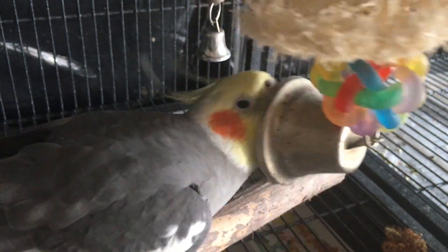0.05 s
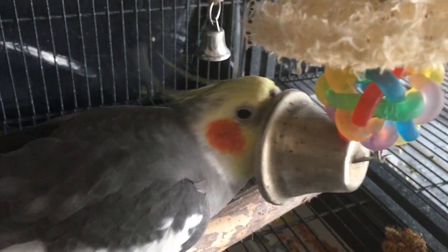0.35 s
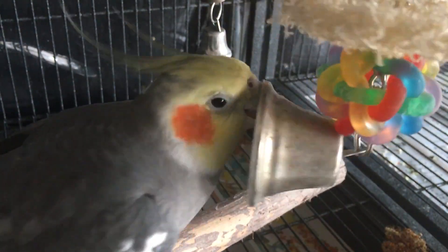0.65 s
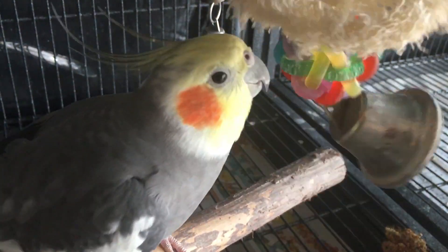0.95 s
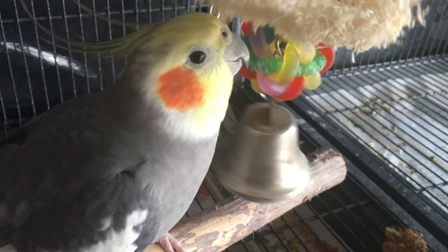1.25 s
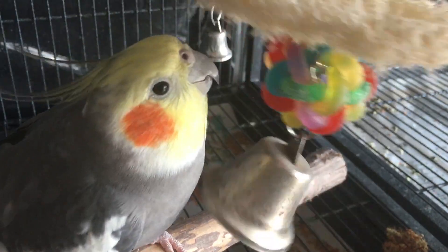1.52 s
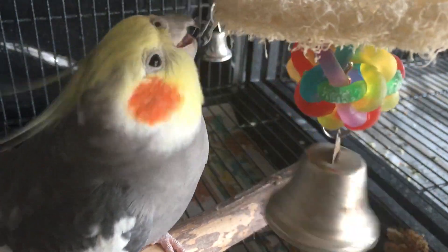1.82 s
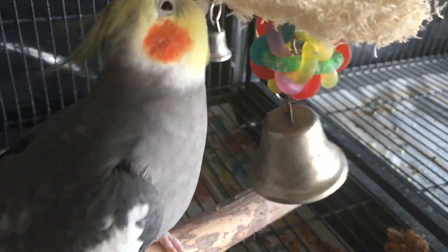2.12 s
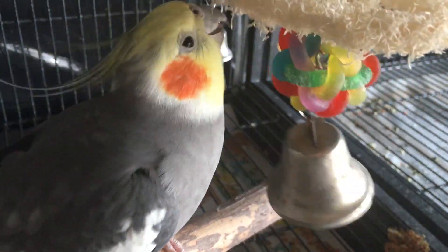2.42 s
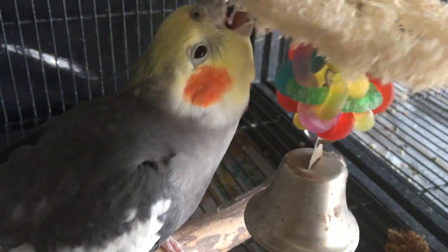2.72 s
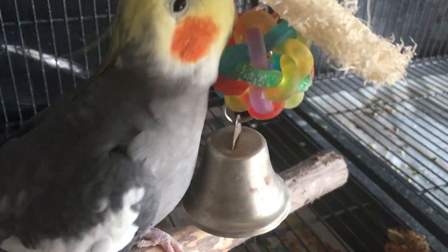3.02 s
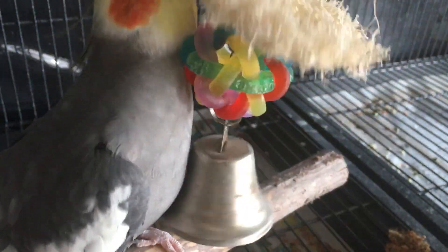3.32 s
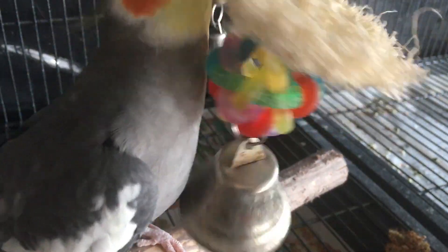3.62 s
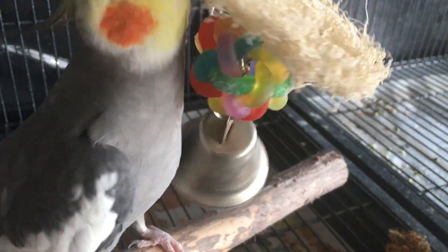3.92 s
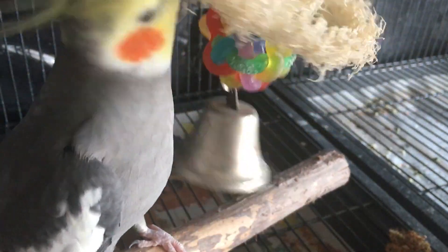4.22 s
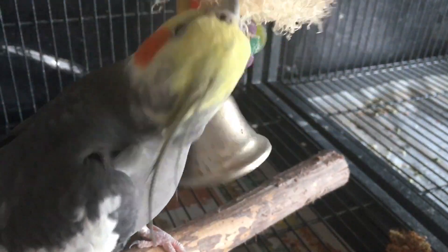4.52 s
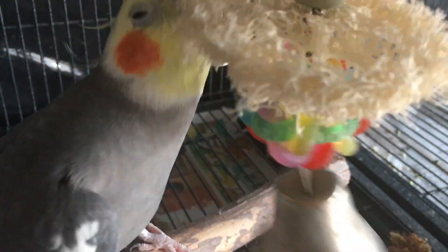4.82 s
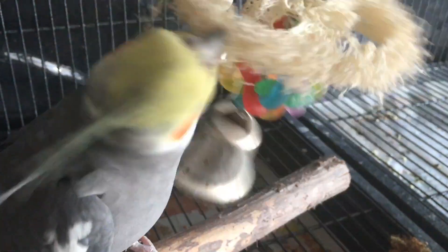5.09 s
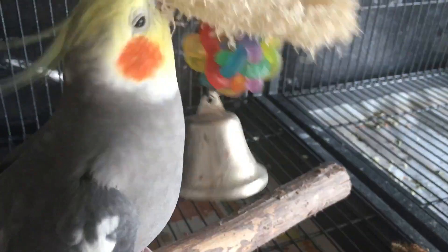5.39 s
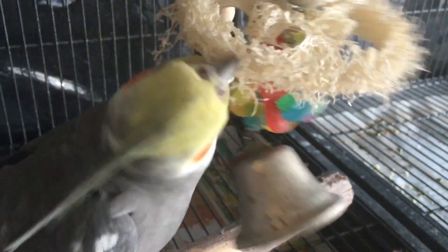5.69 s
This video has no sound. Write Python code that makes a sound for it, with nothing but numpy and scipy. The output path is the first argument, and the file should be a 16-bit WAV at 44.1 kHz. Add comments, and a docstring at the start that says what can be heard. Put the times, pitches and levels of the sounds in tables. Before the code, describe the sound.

Close to the microphone, a small metal bell tinkles faintly and then rings out three times as a caged bird pushes at it. The beak scrapes and nibbles quietly while a hook and plastic rings click and the toy knocks about. The cage gives one dull thump before the bell rings twice more. The room has a short echo and a faint, steady electrical hum.

```python
"""A cockatiel plays with a hanging toy in its cage, close up. Chain links ping and the beak nudges the
clapper inside a small steel bell; from 0.9 s the clapper lands three bright, ringing blows. A quieter
stretch follows: hook and plastic rings tick, the beak rasps and nibbles on fibre, the hollow toy knocks
about. Near 4.8 s a hard tug jolts the cage, and two more bell strikes close the scene. All along, the
cage scatters the clicks, the room adds a short tail, and room noise and mains hum lie underneath."""
import sys
import numpy as np
from scipy import signal
from scipy.fft import rfft, irfft, next_fast_len
from scipy.io import wavfile
from scipy.ndimage import map_coordinates

SR = 44100
rng = np.random.default_rng(int(sys.argv[2]) if len(sys.argv) > 2 else 0)


def dump_mix(stems):
    """Bounce the given channels to the path in sys.argv[1] as a 16-bit WAV at rate SR."""
    frames = np.atleast_2d(stems).T  # one column per channel
    limited = np.clip(frames, -1, 1)  # hard clip at full scale
    pcm = np.round(limited * 32767).astype(np.int16)
    wavfile.write(sys.argv[1], SR, pcm)


N = 262395

# steel bell modes: f/Hz, level/dB, t60/s, gain/dB per unit of position across the rim, same along it
BELL_MODES = [(1217.3, -38, .55, -14, 12), (1220, -41, 1.4, -8, 2), (1311.5, -38, .8, 5.5, 1),
              (2866, -36.5, .3, -14, 3), (2875, -35.5, .6, -12, 0), (4753, -51, .32, 8, 2),
              (7797, -32, .32, -3, -6), (7933, -28, .34, -10, -3), (8525, -15, .22, 4, 0),
              (8578, -3, .135, 5.5, 1), (8768, -22, .35, -1, -3), (11130, -35, .17, 4, -7),
              (11329, -23, .16, 3, -1), (11510, -14.5, .09, 3, 5), (11600, -7.5, .11, -3, -7),
              (11792, -18.5, .16, 5, -10), (11904, -19, .11, 9, 4), (12872, -11.5, .07, 0, -7),
              (12955, -21, .09, 0, 1), (14855, -20.5, .115, 1, -5), (15180, -36, .18, 2, -1)]
# clapper blows: t/s, ring level/dB, position across the rim, position along it, crack level/dB
BELL_STRIKES = [(.9244, -11.5, 1, -1.13, -17), (1.2835, -10.5, -0.071, -0.44, -23),
                (1.6972, -17.5, 0.8, -0.099, -26), (5.4322, -11, -0.44, 0.14, -23),
                (5.9, -13.5, -1.14, -0.27, -24.5)]
# modes of the small parts: f/Hz, level/dB, t60/s
CLAPPER_MODES = [(8650, -4.5, .12), (10280, -2, 0.088), (12995, -6, .1)]
LINK_MODES = [(12100, -10, .04), (12400, -7, .03), (12620, -4, .016), (13100, -9, .03)]
TINY_BELL_MODES = [(9500, -28, 0.078), (13900, -1, 0.17)]
PLASTIC_MODES = [(2420, -6, .04), (3280, 0, .045), (3650, -4, .035), (5700, -1, .03), (6600, -4, .03)]
# featured ticks of beak, hook and rings: t/s, level/dB, treble trim/dB, body trim/dB
TOY_TICKS = [(0.057, -57, 12.5, 7), (0.1296, -55.5, 8, 13), (.15, -54.5, 7, 5), (0.1771, -44.5, -5, -5),
             (0.2206, -44, -10, -1.5), (0.3965, -50, -9, 7.5), (.63, -42.5, -3, 2), (0.7952, -45, 4.5, -5),
             (.8478, -43, 2.5, -3), (0.9009, -33.5, 6, -8), (0.944, -35.5, -16, -6), (0.982, -38, -19, 1),
             (1.1276, -52.5, -9.5, 5), (1.4134, -50, 3, -20), (1.476, -49.5, -5, -18),
             (1.5693, -46.5, -5.5, -16), (1.6164, -52.5, -6.5, 0), (1.771, -42, 0, 5),
             (2.1161, -44.5, -6, -18), (2.2756, -49, -1, -21.5), (2.778, -52.5, 1.5, -18),
             (2.9126, -50.5, 7, -13.5), (3.042, -50.5, -5, -8), (3.0919, -52, 4.5, -13),
             (3.2481, -42.5, 3, -15.5), (3.5667, -46.5, 3, -18), (3.7926, -51.5, 2.5, 0.5),
             (3.8431, -47, -19.5, -14), (4.1634, -49.5, -1, -20), (4.7209, -53, 0, 5),
             (4.775, -39.5, 9.5, -19), (4.962, -41, -6, -16), (5.047, -51, -4.5, -14),
             (5.1662, -51, 2.5, -16), (5.353, -56.5, 11.5, -17.5), (5.5601, -41, 6.5, -2),
             (5.647, -45.5, 9.5, -12), (5.886, -44.5, 10.5, -19)]
# cues for the swinging toy, its chain and the tiny bell overhead: t/s, level/dB
TOY_KNOCKS = [(2.839, -48), (3.515, -56.5), (3.674, -46.5), (3.982, -45), (4.458, -40), (4.512, -44),
              (4.774, -41)]
LINK_PINGS = [(.0095, -34), (.0222, -32.5), (.058, -54), (.124, -40), (2.1147, -31), (3.5667, -46.5)]
TINY_BELL_TINKLES = [(1.062, -57), (1.622, -68.5), (2.14, -64), (5.783, -64), (5.80, -62)]
# featured rasps of the beak on fibre and plastic: t/s, length/s, level/dB
BEAK_RASPS = [(.115, .041, -56.5), (.429, 0.061, -51), (.892, 0.032, -42), (2.155, 0.039, -54),
              (4.351, 0.034, -46.5), (4.607, 0.02, -53.5), (4.732, 0.032, -41.5)]
# how hard the bird works at the toy: t/s, level/dB
BIRD_EFFORT = [(0.0, -68), (0.18, -78.5), (0.78, -73.5), (1.46, -81), (1.74, -74), (2.02, -84), (2.25, -74),
               (2.6, -82.5), (3.5, -78.5), (3.86, -72), (4.32, -78), (4.74, -70.5), (5.22, -74), (5.5, -69),
               (5.68, -80.5), (5.95, -78.5)]
# resonances of the hollow toy and the jolted cage: f/Hz, width/Hz, level/dB
TOY_BODY = [(852, 150, 7.5), (1026, 177, 5), (1280, 125, 4.5), (1740, 190, -2), (2870, 590, -9)]
CAGE_BODY = [(184, 20, 9), (354, 87, 4.5), (540, 490, -2.5), (810, 170, 1)]
# noise colours of the clapper's crack, a tick's three bands, the fibre and the room: f/Hz, level/dB
CRACK_EQ = [(300, -28), (1100, -12), (1900, -7), (2650, 6), (3400, 0), (4400, -4), (6500, -1), (8500, 2),
            (10000, -5), (12500, 1), (15000, -4), (16500, -18)]
TICK_BODY_EQ = [(200, -26), (800, -4), (1800, -1), (2800, -10), (5000, -25.5)]
TICK_MID_EQ = [(1200, -26.5), (2400, -8), (3200, 2.5), (4600, -3), (5900, 2), (8500, -7), (12000, -26.5)]
TICK_TOP_EQ = [(5000, -24.5), (9000, -1.5), (12500, 2), (15300, -3.5), (17000, -18.5)]
FIBRE_EQ = [(300, -27), (1200, -3), (3000, 1), (5000, -7.5), (6800, -2.5), (10000, -5.5), (13000, -1.5),
            (16000, -6.5)]
ROOM_TONE_EQ = [(20, -17.5), (45, -2), (80, 5), (140, 0.5), (200, -4), (310, -8), (480, -15.5),
                (600, -14.5), (830, -9), (1500, -15), (2200, -21.5), (5000, -30.5), (10000, -37),
                (16000, -34.5)]
# mains hum partials: f/Hz, rms level/dB
HUM_PARTIALS = [(60, -56), (120, -64)]
# decay of the room's tail: f/Hz, t60/s
ROOM_DECAY = [(200, 0.4), (1500, 0.14), (8500, 0.39), (12000, 0.29), (16000, 0.197)]


def bell(attack_s=0.0003):
    """Where the clapper lands decides which of the closely paired modes ring and beat."""
    out, t = np.zeros(N), clock(.9)
    hz, db, t60, across_db, along_db = np.transpose(BELL_MODES)
    for s, ring_db, across, along, crack_db in BELL_STRIKES:
        tone = ring(hz, ring_db + db + across * across_db + along * along_db, t60, t)
        burst = noise(CRACK_EQ, len(t), ripple_db=2.5)
        crack = burst * snap(t, snap_t60=0.0048, scatter_db=-12.5, scatter_t60=0.06)
        add(out, s, tone * (1 - np.exp(-t / attack_s)) + amp(crack_db) * crack)
    return out


def clapper(beak_out_s=.9, nudge_db=-60, spread_db=2.5):
    """The clapper tinkles faintly for as long as the beak is inside the bell."""
    nudges = [(s, nudge_db + spread_db * luck) for s, _, luck in moments(count=80) if s < beak_out_s]
    return small_steel(nudges, CLAPPER_MODES)


def small_steel(hits, modes):
    """Little steel parts ring high and short at each hit."""
    out, t = np.zeros(N), clock(0.24)
    hz, db, t60 = np.transpose(modes)
    for s, hit_db in hits:
        add(out, s, ring(hz, hit_db + db, t60, t))
    return out


def hook_and_rings(jiggle_db=-54.5, spread_db=3.5):
    """The hook and plastic rings tick at each tug and jiggle faintly in between."""
    out = np.zeros(N)
    for s, db, treble_db, body_db in TOY_TICKS:
        add(out, s, tick(db, treble_db, body_db))
    for s, push_db, luck in moments(count=36):
        add(out, s, tick(jiggle_db + push_db + spread_db * luck, treble_db=1, body_db=0))
    return out


def tick(db, treble_db, body_db):
    """A hard contact chatters as it settles, rings the plastic and stirs the bell through its hook."""
    t = clock(.2)
    bands = [(TICK_MID_EQ, -3), (TICK_TOP_EQ, treble_db), (TICK_BODY_EQ, body_db - 4.5)]
    hiss = sum(amp(level) * noise(eq, len(t), ripple_db=4) for eq, level in bands)
    chatter = amp(3 * wobble(len(t), knots=120) * (1 - fade(t, .02)))  # eases in after the transient
    contact = snap(t, snap_t60=0.0044, scatter_db=-5.5, scatter_t60=0.061) * chatter
    plastic = amp(-16) * light_touch(PLASTIC_MODES, t)
    shimmer = amp(treble_db - 20.5) * light_touch(BELL_MODES, t)
    return amp(db) * (hiss * contact + plastic + shimmer)


def knocks(jolt_s=4.7745, jolt_db=-32):
    """Softer blows sound the hollow middle of the toy; the hardest tug also jolts the cage."""
    out = np.zeros(N)
    for s, db in TOY_KNOCKS:
        add(out, s, amp(db) * soft_blow(TOY_BODY, rise_s=0.0017, t60=0.092))
    add(out, jolt_s, amp(jolt_db) * soft_blow(CAGE_BODY, rise_s=0.001, t60=0.047))
    return out


def soft_blow(body, rise_s, t60):
    """A dull contact: a noise burst coloured by the resonances of what it hits."""
    t = clock(0.22)
    hollow = unit(resonate(rng.standard_normal(len(t)), body))
    return hollow * fade(t, t60) * (1 - np.exp(-t / rise_s))


def beak_rasps(scrape_db=-63, scrape_s=.04):
    """Beak friction: bright swells of noise, with faint scrapes between them."""
    out = np.zeros(N)
    scrapes = [(s, scrape_s * np.exp(luck / 4), scrape_db + push_db)
               for s, push_db, luck in moments(count=20)]
    for s, seconds, db in list(BEAK_RASPS) + scrapes:
        swell = np.sqrt(np.hanning(int(seconds * SR)))
        add(out, s, amp(db) * swell * noise(FIBRE_EQ, len(swell), ripple_db=3.5))
    return out


def nibbling(crumb_db=-62.5, spread_db=4.5):
    """Tiny snaps of fibre at random moments, stronger while the beak is busy."""
    out, t = np.zeros(N), clock(.035)
    for s, push_db, luck in moments(count=300):
        crumb = noise(FIBRE_EQ, len(t), ripple_db=4.5) * fade(t, t60=0.025)
        add(out, s, amp(crumb_db + push_db + spread_db * luck) * crumb)
    return out


def room_tail(x):
    """A short diffuse reverb that dies fastest in the mids and at the very top."""
    hz, t, spectra = signal.stft(rng.standard_normal(SR // 2), SR, nperseg=256)
    decay = fade(t, curve_at(ROOM_DECAY, hz)[:, None])
    tail = signal.istft(spectra * decay, SR, nperseg=256)[1]
    tail = np.pad(tail, (SR // 200, 0))  # 5 ms pre-delay
    return signal.fftconvolve(x, tail / np.linalg.norm(tail))[:N]


def background(room_tone_db=-58.0, waver_db=1):
    """The bed: steady room tone and a slightly unsteady mains hum."""
    t = np.arange(N) / SR
    hum = sum(amp(db + waver_db * wobble(N, knots=33)) * np.sqrt(2) * np.sin(2 * np.pi * hz * t)
              for hz, db in HUM_PARTIALS)
    return hum + amp(room_tone_db) * noise(ROOM_TONE_EQ, N)


def moments(count, db_per_effort_db=1.5):
    """Chance cues spread over the scene: t/s, push from the bird's effort/dB, luck (a normal draw)."""
    s = (np.arange(count) + rng.uniform(0, 1, count)) * N / SR / count
    times, effort_db = np.transpose(BIRD_EFFORT)
    push_db = db_per_effort_db * (np.interp(s, times, effort_db) - effort_db.mean())
    return zip(s, push_db, rng.standard_normal(count))


def ring(hz, db, t60, t):
    """Decaying modes started by one blow; high neighbours swing in opposite polarity."""
    polarity = np.where(hz > 7000, (-1) ** np.arange(len(hz)), 1)
    partials = np.sin(2 * np.pi * hz[:, None] * t) * fade(t, t60[:, None])
    return (polarity * amp(db)) @ partials


def light_touch(modes, t):
    """A touch at a chance spot rings each mode at a new strength."""
    hz, db, t60 = np.transpose(modes)[:3]
    return ring(hz, db + rng.normal(0, 4, len(hz)), t60, t)


def snap(t, snap_t60, scatter_db, scatter_t60):
    """Envelope of a contact: a sharp spike, then scatter from the bars and tray."""
    return fade(t, snap_t60) + amp(scatter_db) * fade(t, scatter_t60)


def resonate(x, body):
    """Pass x through parallel resonances of alternating polarity."""
    size = next_fast_len(len(x) + SR // 8)
    f = np.fft.rfftfreq(size, 1 / SR)
    gain = sum((-1) ** k * amp(db) * 1j * f * width / (hz * hz - f * f + 1j * f * width)
               for k, (hz, width, db) in enumerate(body))
    return irfft(rfft(x, size) * gain, size)[:len(x)]


def noise(eq, size, ripple_db=0):
    """Coloured noise of rms 1; ripple gives it chance resonances of its own."""
    hz = np.fft.rfftfreq(size, 1 / SR)
    colour = amp(curve_at(eq, hz) + ripple_db * wobble(len(hz), knots=70))
    return unit(irfft(rfft(rng.standard_normal(size)) * colour, size))


def wobble(size, knots):
    """A smooth random curve through so many knots."""
    return map_coordinates(rng.standard_normal(int(knots) + 4), [np.linspace(0, knots, size)])


def curve_at(points, hz):
    """Read a curve of (f/Hz, value) points on a log frequency axis."""
    f, values = np.transpose(points)
    return np.interp(np.log(hz + 1), np.log(f + 1), values)


def fade(t, t60):
    """Exponential decay, 60 dB down after t60 seconds."""
    return np.exp(-np.log(1000) * t / t60)


def amp(db):
    """Decibels to gain."""
    return 10 ** (np.asarray(db) / 20)


def unit(x):
    """Scale to rms 1."""
    return x / np.sqrt(np.mean(x ** 2) + 1e-20)


def clock(seconds):
    """Sample times of a short sound."""
    return np.arange(int(seconds * SR)) / SR


def add(track, s, sound):
    """Mix a sound into a track at s seconds."""
    part = track[max(round(s * SR), 0):][:len(sound)]
    part += sound[:len(part)]


def scene(reverb_db=-18):
    """The mono mix: the cage up front, a touch of room, the bed underneath."""
    steel = bell() + clapper()
    chain = small_steel(LINK_PINGS, LINK_MODES)
    tiny_bell = small_steel(TINY_BELL_TINKLES, TINY_BELL_MODES)
    cage = steel + chain + tiny_bell + hook_and_rings() + nibbling() + knocks() + beak_rasps()
    return (cage + amp(reverb_db) * room_tail(cage) + background())[None]


def record(dry):
    """A steep high cut at 15.9 kHz."""
    return signal.sosfilt(signal.ellip(10, .1, 90, 15900, fs=SR, output="sos"), dry)


dry = scene()
out = record(dry)
dump_mix(out)
```